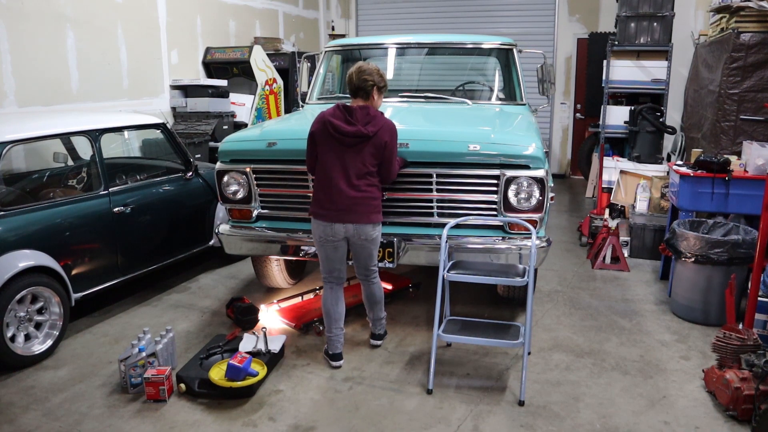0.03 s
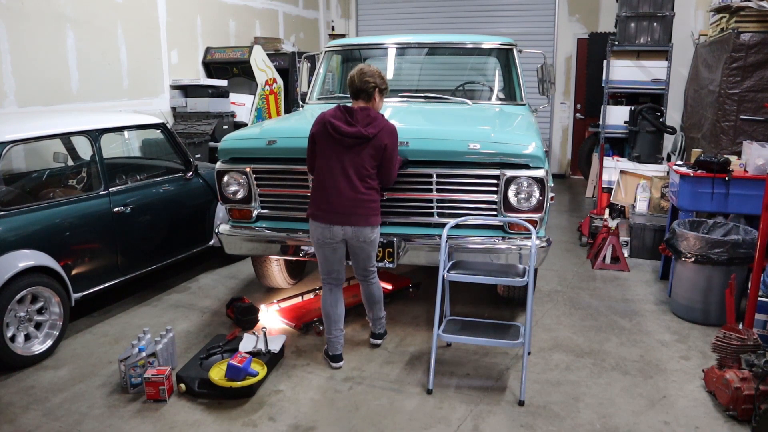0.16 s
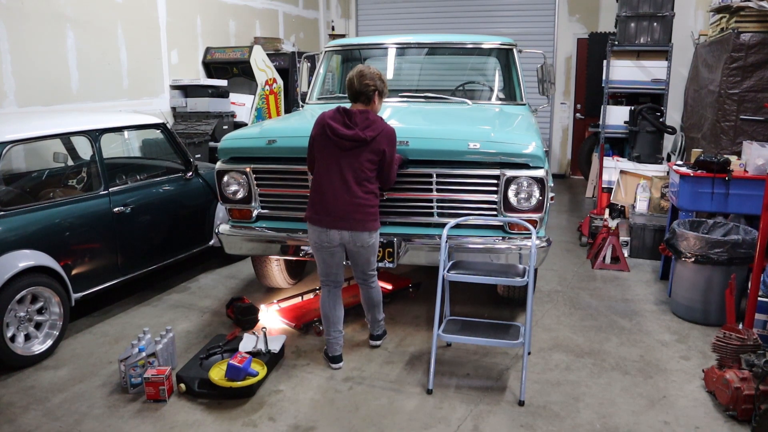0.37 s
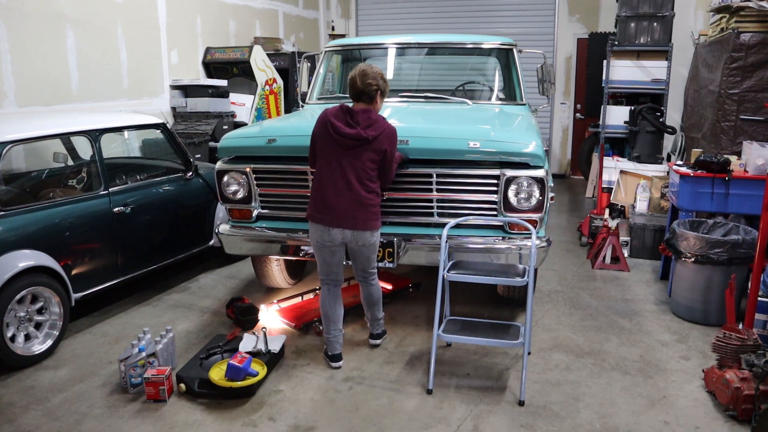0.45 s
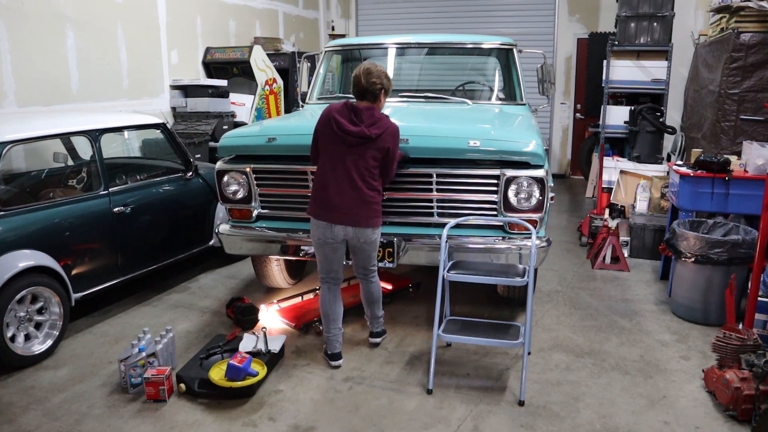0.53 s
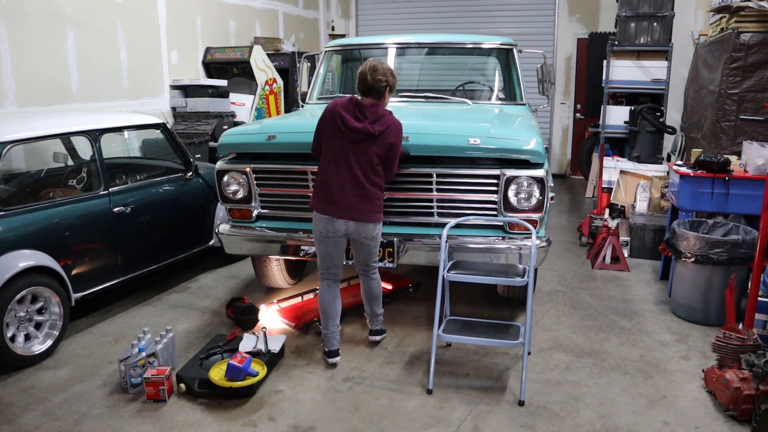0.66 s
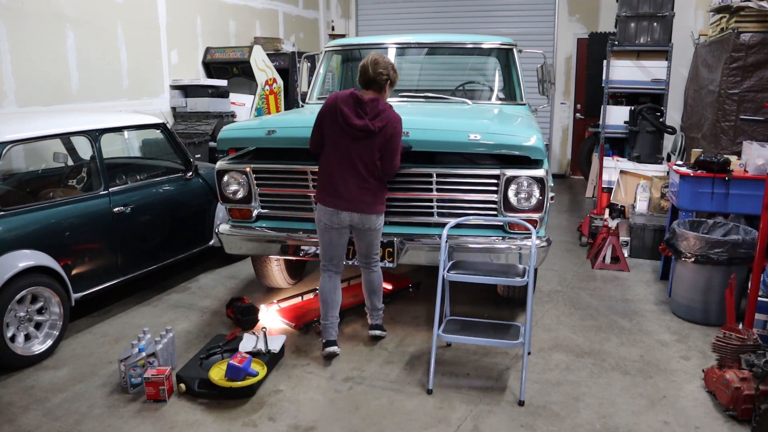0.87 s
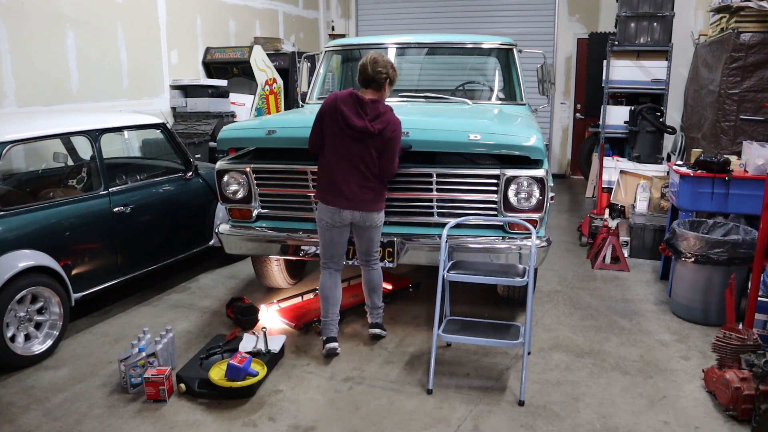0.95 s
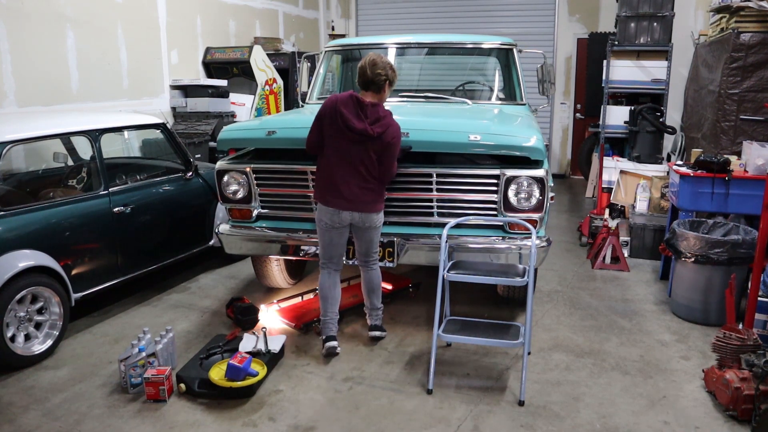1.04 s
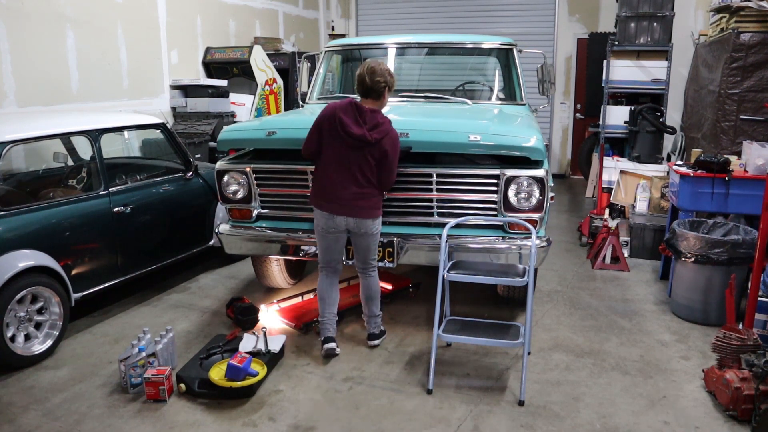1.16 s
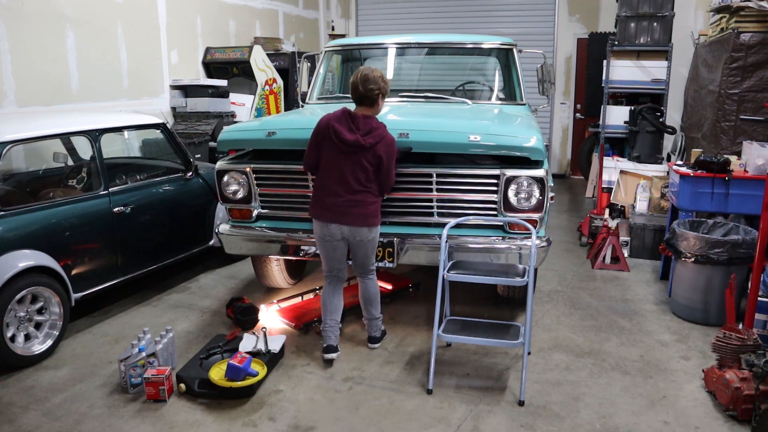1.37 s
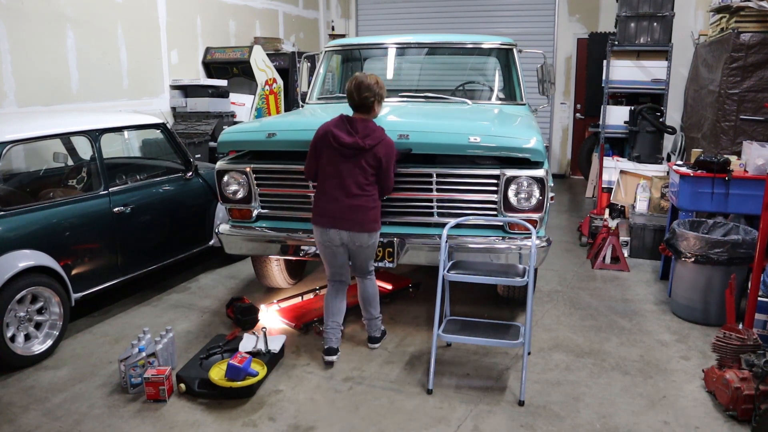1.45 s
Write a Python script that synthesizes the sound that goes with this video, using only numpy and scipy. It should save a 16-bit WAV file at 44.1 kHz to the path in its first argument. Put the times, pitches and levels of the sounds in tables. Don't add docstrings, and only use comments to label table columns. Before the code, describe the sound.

A heavy truck hood is unlatched and raised in a concrete garage. At about 0.2 s a loud, hollow sheet-metal clunk booms and rattles until 0.4 s, then fades. After a quiet gap, a second clank begins at 0.94 s, with a brief low hinge judder from 1.02 s and bright latch clacks around 1.13-1.2 s. Small metallic ticks follow until 1.4 s, over short reverberation and faint hum.

```python
import sys
import numpy as np
from scipy import signal
from scipy.fft import rfft, irfft
from scipy.io import wavfile
from scipy.ndimage import uniform_filter1d

SR = 44100
rng = np.random.default_rng(int(sys.argv[2]) if len(sys.argv) > 2 else 0)


def volts_from_db(level):
    exponent = np.asarray(level, float) / 20
    return 10 ** exponent


def file_out(sig):
    cols = np.atleast_2d(sig).T
    lim = np.clip(cols, -1, 1)
    pcm = np.round(lim * 32767).astype(np.int16)
    wavfile.write(sys.argv[1], SR, pcm)


N = 66150
LEAD_S = 0.25
M = N + int(LEAD_S * SR)

# start in seconds, panel level in dB, latch level in dB, crack level in dB,
# chatter decay in seconds.
KNOCKS = [(-.05, -33, -65, -40, 0.034), (0.2056, -8.5, -24, -10, 0.0085), (.218, -7.5, -47, -44, 0.045),
          (.277, -16.5, -54, -49, 0.041), (.338, -17.5, -51, -30.5, 0.028), (.375, -24.5, -54, -36, 0.023),
          (0.644, -37, -68, -71, 0.054), (.701, -51, -49.5, -57, 0.12), (.826, -60, -53, -55.5, 0.055),
          (0.9406, -19.5, -21.5, -30, 0.018), (.965, -21, -57, -50, 0.037), (1.002, -14, -16, -36, 0.013),
          (1.012, -13, -26, -35, 0.031), (1.05, -18.5, -33, -51, 0.0097), (1.129, -33, -15, -17.5, 0.024),
          (1.153, -54, -15, -12.5, 0.018), (1.19, -64, -23.5, -25.5, 0.069), (1.235, -34, -49, -42, 0.0067),
          (1.288, -57, -31, -31, 0.045), (1.33, -44, -29, -40, 0.0076), (1.352, -47, -31.5, -57, 0.046),
          (1.394, -66, -39, -40, 0.033)]


def curve(hz, table):
    t = np.array(table, float)
    return np.interp(np.log(np.maximum(hz, 1)), np.log(np.maximum(t[:, 0], 1)), t[:, 1])


def colour(x, table):
    n = x.shape[-1]
    gain = volts_from_db(curve(np.fft.rfftfreq(n, 1 / SR), table))
    return irfft(rfft(x) * gain, n)


def unit(x):
    return x / np.sqrt(np.sum(x ** 2, axis=-1, keepdims=True))


def fade(t, t60):
    return np.exp(-np.log(1000) * t / np.maximum(t60, 0.002))


def add(out, x, s):
    i = int((s + LEAD_S) * SR)
    out[i:i + len(x)] += x[:len(out) - i]


def third_octaves(n, count=2):
    spec = rfft(rng.standard_normal((count, n)))
    f = np.fft.rfftfreq(n, 1 / SR)
    for hz in 30 * 2 ** np.arange(0, 9.4, 1 / 3):
        band_gain = np.maximum(1 - abs(3 * np.log2((f + 1) / hz)), 0)
        yield hz, irfft(spec * band_gain, n)


def knocks():
    # frequency in Hz, level in dB, t60 in seconds.
    panel_modes = [(334, 8.5, 0.11), (390, 6.5, 0.31), (477.3, -3.5, 0.28), (566, -4, 0.15),
                   (673, 0.5, 0.5), (737, 7.5, 0.14), (813.4, 0, 0.18), (948, -17, 0.063), (1172, -7, .15),
                   (1883, 14, 0.031)]
    latch_modes = [(1109, 5, 0.052), (1250, -16, 0.03), (1480, -28, .1), (1707, -8.5, 0.065),
                   (1987, -1, 0.083), (2300, -4, 0.057), (2327, 2.5, 0.079), (3160, -10, 0.22),
                   (3770, -10, 0.064), (5560, -11, 0.04), (8350, -29, 0.13)]
    # frequency in Hz, level in dB per third octave.
    panel_dense = [(120, -11), (330, -10.5), (480, -3.5), (1000, -2.5), (2200, -4.5), (3400, -10),
                   (5500, -17), (8000, -46)]
    latch_dense = [(500, -16.5), (1100, 0), (2400, -2), (3200, -7.5), (5500, -3), (9000, -1), (13000, -6.5),
                   (15500, -31)]
    crack_colour = [(300, -17.5), (1500, -6), (3000, -0.5), (5500, 0.5), (8000, -10.5), (11000, -5.5),
                    (13500, -12), (15500, -37)]
    panel_t60_s, latch_t60_s, crack_t60_s = 0.2, 0.17, 0.011
    panel_lines_db, latch_lines_db = -9.5, -6.5
    chatter_per_s, chatter_scatter_db = 2200, 1.5
    tick_hz, tick_t60_s, tick_db = 4400, 0.0014, -20.5

    out, table = np.zeros(M), np.array(KNOCKS)
    draw = rng.random((len(KNOCKS), 2, 6000))
    hit = (draw[:, 0] < chatter_per_s / SR) * volts_from_db(-chatter_scatter_db * np.log(draw[:, 1]))
    dying = np.exp(-np.arange(6000) / SR / table[:, 4:])
    blows = hit * np.sign(rng.standard_normal(hit.shape)) * dying
    grain = np.tile(np.sqrt(signal.lfilter([1], [1, -0.95], hit ** 2)), 2) + 0.42

    panel = volts_from_db(panel_lines_db) * body(panel_modes, blows) + field(panel_dense, panel_t60_s, slope=0.3)
    latch = volts_from_db(latch_lines_db) * body(latch_modes, blows) + field(latch_dense, latch_t60_s, slope=0.79)
    t = np.arange(grain.shape[1]) / SR
    tick = unit(np.sin(2 * np.pi * tick_hz * t) * fade(t, tick_t60_s))
    crack = unit(grain * field(crack_colour, crack_t60_s, slope=0.12)) + volts_from_db(tick_db) * tick

    mix = volts_from_db(table[:, 1:2]) * panel + volts_from_db(table[:, 2:3]) * latch + volts_from_db(table[:, 3:4]) * crack
    for row, ring in zip(table, mix):
        add(out, 20 * ring, row[0])
    return out


def body(named, blows):
    mode_scatter_db = 2.5
    t, named = np.arange(12000) / SR, np.array(named)
    z = rng.standard_normal((len(KNOCKS), 2, len(named)))
    gains = volts_from_db(named[:, 1] + mode_scatter_db * z[:, 0]) * np.sign(z[:, 1])
    lines = gains @ (np.sin(2 * np.pi * named[:, :1] * t) * fade(t, named[:, 2:]))
    return unit(signal.fftconvolve(lines, blows, axes=1)[:, :len(t)])


def field(table, t60, slope):
    chatter_rise_s = 0.00083
    t, out = np.arange(12000) / SR, 0
    chatter = (1.1 - np.exp(-t / chatter_rise_s)) ** 2 * np.exp(-2 * t / np.array(KNOCKS)[:, 4:])
    for hz, band in third_octaves(len(t), count=len(KNOCKS)):
        loss = fade(1 / SR, t60 * (1000 / hz) ** slope) ** 2
        swell = np.sqrt(signal.lfilter([1], [1, -loss], chatter))
        out = out + volts_from_db(curve(hz, table)) * unit(band * swell)
    return unit(out)


def rings():
    # start in seconds, frequency in Hz, level in dB, t60 in seconds.
    parts = [(-.01, 388.5, -33, 0.27), (1.048, 644, -17, 0.21), (1.008, 1850, -14.5, 0.071),
             (.204, 99.2, -8, 0.15), (.216, 545, -7, 0.068), (.228, 390, -11, 0.13),
             (.212, 1160, -13.5, 0.14), (.25, 692, -12, 0.11), (1.155, 1257, -18.5, .1),
             (.21, 780, -27, 0.1), (.212, 229, -21, .12), (.232, 830, -31, .15), (.215, 463, -12, 0.11),
             (.24, 170, -21, 0.1), (.25, 330, -17, 0.2), (.275, 169, -16.5, 0.18), (.222, 68, -14, .35),
             (.30, 684, -18, 0.19), (.335, 704, -22, 0.087), (.335, 229, -12, 0.15),
             (.39, 279, -17.5, 0.15), (.37, 478, -22.5, 0.11), (0.439, 128.6, -23.5, 0.13),
             (.56, 125, -33, .15), (0.671, 129, -38, 0.23), (.812, 131, -40, 0.15),
             (.955, 542, -21.5, 0.13), (.96, 827, -23, .15), (1.013, 547.7, -15, .2),
             (1.38, 125, -38, 0.15), (1.036, 1393, -25, .1), (1.041, 274, -23.5, 0.31),
             (1.205, 2390, -31, .12), (1.232, 800, -27, .07), (1.231, 1140, -34, 0.055),
             (1.342, 1950, -31, 0.1), (1.348, 808, -29.5, 0.073), (1.215, 111, -40, 0.086),
             (1.45, 129, -38.5, 0.1), (.943, 131.5, -24, 0.89), (.958, 469, -23, 0.24),
             (1.003, 99.4, -15, 0.19), (1.003, 729, -13.5, 0.11), (1.008, 1135, -17, 0.13),
             (1.014, 53.2, -19.5, 0.8), (1.033, 459, -9.5, 0.09), (1.132, 1097, -9.5, 0.06),
             (1.132, 2273, -17, 0.052), (1.151, 1707, -13, 0.12), (1.288, 1480, -25, 0.073),
             (1.329, 1080, -26.5, 0.046), (1.349, 1705, -28, 0.095), (1.36, 2420, -29.5, 0.13),
             (1.393, 1076, -28, 0.053)]
    rise_s, rough = 0.0025, 0.4
    out, t = np.zeros(M), np.arange(12000) / SR
    waver = np.cumsum(rng.standard_normal((60, len(t))), axis=1) / 20
    for (s, hz, db, t60), drift in zip(parts, waver):
        pace = np.sqrt(hz / 1000)
        note = np.sin(2 * np.pi * hz * t + rough * drift * pace)
        swell = 1 - np.exp(-t / rise_s * pace)
        add(out, volts_from_db(db) * note * swell * fade(t, t60), s)
    return out


def flexes():
    # start in seconds, level in dB, push in seconds, ring t60 in seconds.
    pushes = [
        (.2035, -18.5, 0.00088, 0.23),
        (.26, -17.5, 0.0052, 0.28),
        (.33, -20, 0.008, 0.26),
        (.44, -25, 0.0073, 0.24),
        (.51, -35.5, 0.011, 0.59),
        (.64, -38.5, 0.0063, 0.91),
        (.945, -35.5, .005, 0.34),
        (1.012, -34, 0.011, 0.49),
        (.82, -40, 0.0051, 0.12),
    ]
    # frequency in Hz, level in dB.
    bends = [(52, 1), (68, -4.5), (101, -5.5), (135, 0.5), (178, -2), (213, -3), (232, -2.5), (272, -3)]
    out, t, modes = np.zeros(M), np.arange(30000) / SR, np.array(bends)
    z = rng.standard_normal((len(pushes), 2, len(modes)))
    for k, (s, db, push_s, t60) in enumerate(pushes):
        hz = modes[:, 0] * (1 + 0.0259 * z[k, 0])
        ring = volts_from_db(modes[:, 1] + 1.6 * z[k, 1]) @ np.sin(-2 * np.pi * hz[:, None] * t)
        add(out, volts_from_db(db) * ring * (1 - np.exp(-t / push_s)) * fade(t, t60), s)
    return out


def judder():
    # start in seconds, end in seconds, first and last slips per second, level in dB.
    slip = (1.022, 1.1363, 129, 137.5, -16)
    # multiple, level in dB.
    orders = [(1, 0.5), (2, -7), (3, -36), (4, -12), (5, -8.5)]
    edge_s, fade_db = 0.024, -8.5
    start, end, first_hz, last_hz, db = slip
    out, t = np.zeros(M), np.arange(int((end - start) * SR)) / SR
    rate_hz = first_hz + (last_hz - first_hz) * np.minimum(2 * t / t[-1], 1)
    phase = 2 * np.pi * np.cumsum(rate_hz) / SR
    tone = sum(volts_from_db(d) * np.cos(k * phase + 6 * rng.random()) for k, d in orders)
    edges = np.minimum(np.minimum(t, t[::-1]) / edge_s, 1)
    add(out, tone * volts_from_db(db + fade_db * t / t[-1]) * edges, start)
    return out


def garage():
    # frequency in Hz, t60 in seconds.
    decay = [(60, 0.78), (250, 0.88), (1000, 0.52), (4000, 0.86), (7000, 0.61), (10000, 0.41),
             (14000, 0.21)]
    # frequency in Hz, level in dB.
    walls = [(60, -10.5), (300, 3), (2000, 0), (6000, -1), (12000, 5.5)]
    mid_rise_s, side_rise_s = 0.037, 0.0012
    early_db, early_t60_s = 2, 0.073
    t = np.arange(40000) / SR
    tail = sum(np.sqrt(hz) * unit(b * fade(t, curve(hz, decay))) for hz, b in third_octaves(len(t)))
    rise = 1 - np.exp(-t / np.array([[mid_rise_s], [side_rise_s]]))
    tail = colour(unit(tail), walls) * rise
    tail[1] += volts_from_db(early_db) * unit(rng.standard_normal(len(t)) * fade(t, early_t60_s))
    return tail


def air():
    # frequency in Hz, level in dB per Hz.
    hum_colour = [(18, -45), (30, -20), (53, -3.5), (267, -11.5), (320, -8), (567, -15.5), (794, -20),
                  (11900, -45.5), (15000, -51)]
    level_db, flicker_db = -43, 3
    out, k = 0, 2000
    for hz, b in third_octaves(M):
        walk = uniform_filter1d(np.repeat(rng.standard_normal(M // k + 1), k), k)[:M]
        out = out + b * volts_from_db(flicker_db * walk)
    out = colour(out, hum_colour)
    return out * volts_from_db(level_db) / np.std(out[0])


def scene():
    # frequency in Hz, level in dB.
    side_colour = [(60, -62), (125, -27), (250, -13), (700, -5), (1300, 1), (2400, 5), (4400, 8.5),
                   (12000, 5.5)]
    ring_wet_db, flex_wet_db, judder_wet_db = -8, -7, -12
    garage_db, side_db, lean_db = -6, -8.5, -28
    left_early_s = 1.2e-5
    hits, notes, boom, shake, hum = knocks(), rings(), flexes(), judder(), air()
    send = hits + volts_from_db(ring_wet_db) * notes + volts_from_db(flex_wet_db) * boom + volts_from_db(judder_wet_db) * shake
    wet = signal.fftconvolve(send[None], garage(), axes=1)[:, :M]
    mid = hits + notes + boom + shake + volts_from_db(garage_db) * wet[0] + hum[0]
    side = colour(volts_from_db(side_db) * wet[1] + hum[1] - volts_from_db(lean_db) * mid, side_colour)
    side = side + left_early_s * SR * np.gradient(mid)
    return np.array([mid + side, mid - side])[:, -N:]


def band_limit(x):
    return signal.sosfilt(signal.butter(12, 15570, fs=SR, output="sos"), x)


def record(dry):
    low_cut_hz, top_hz = 52, 15500
    low_cut = signal.butter(4, low_cut_hz, "high", fs=SR, output="sos")
    top_cut = signal.ellip(8, 0.2, 60, top_hz, fs=SR, output="sos")
    dry = signal.sosfilt(low_cut, dry)
    rounded = 1.2 * np.tanh(dry / 1.2)
    mix = signal.sosfilt(top_cut, rounded)
    return band_limit(mix)


dry = scene()
out = record(dry)
file_out(out)
```